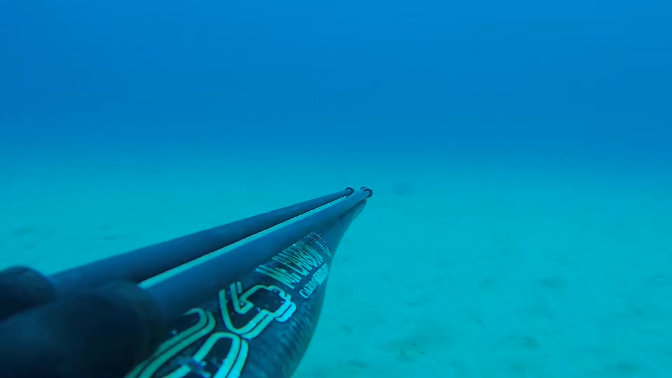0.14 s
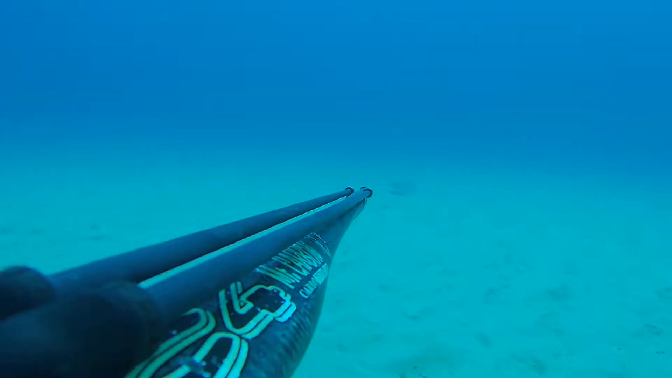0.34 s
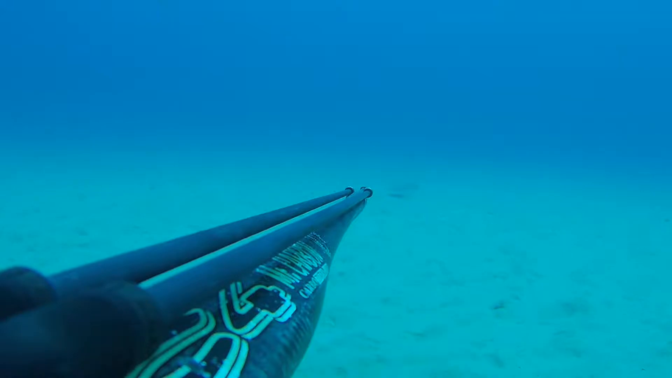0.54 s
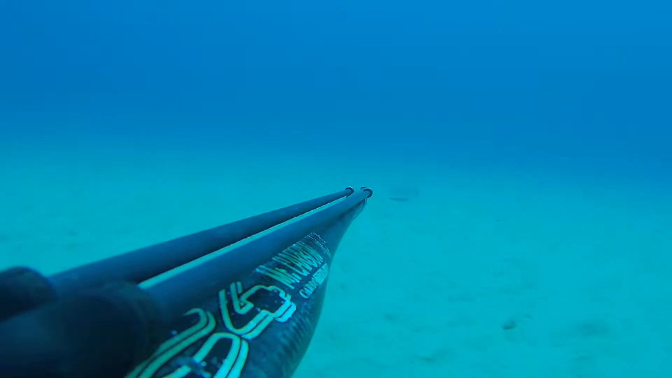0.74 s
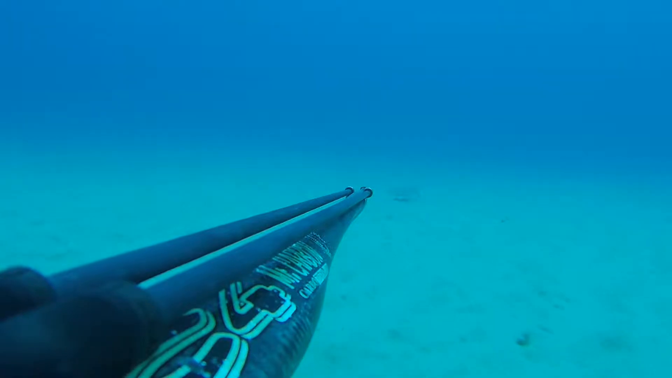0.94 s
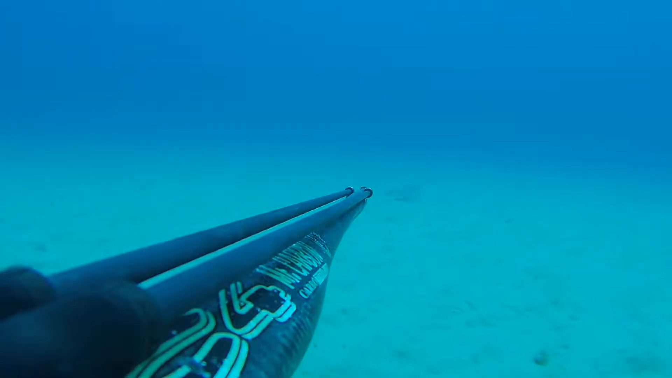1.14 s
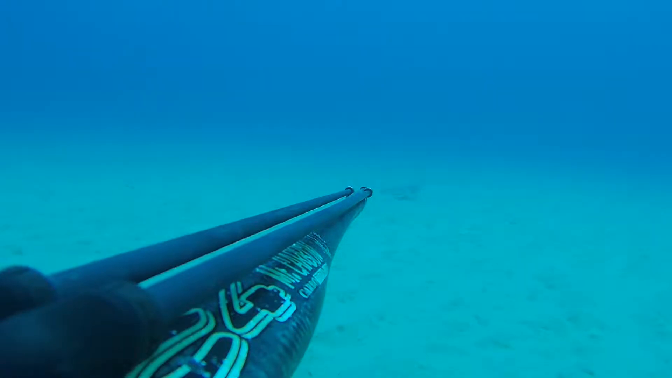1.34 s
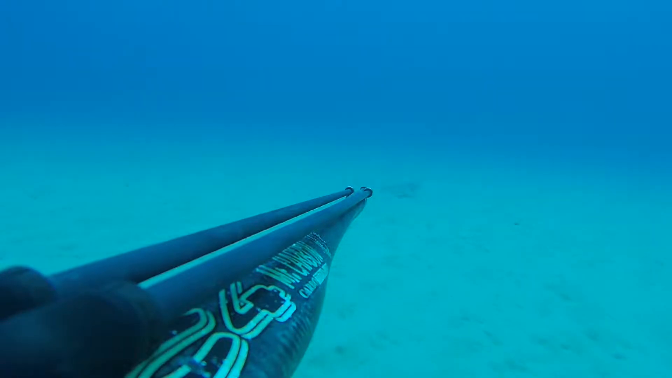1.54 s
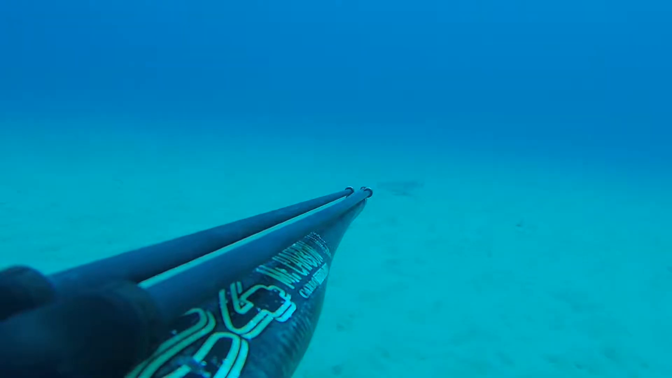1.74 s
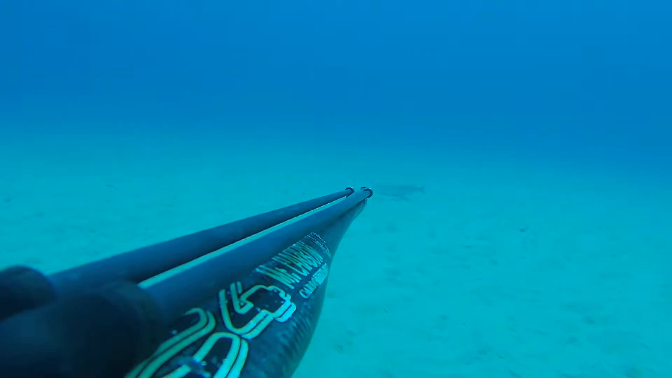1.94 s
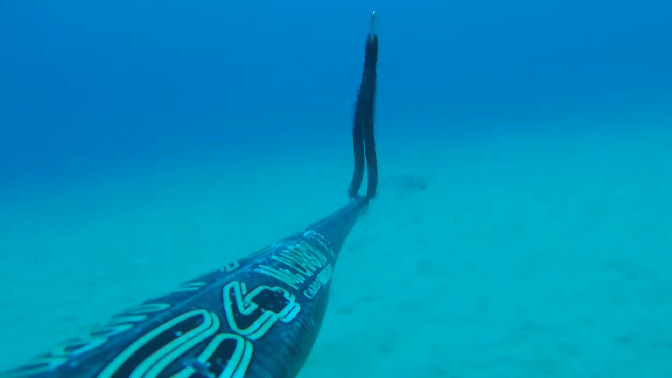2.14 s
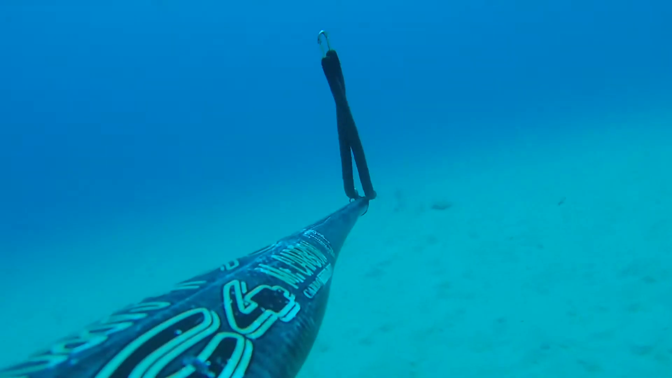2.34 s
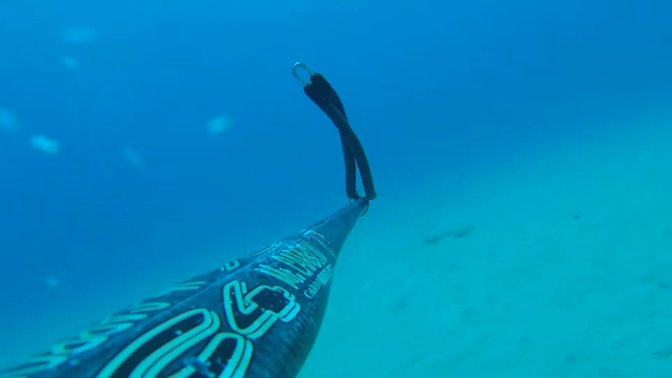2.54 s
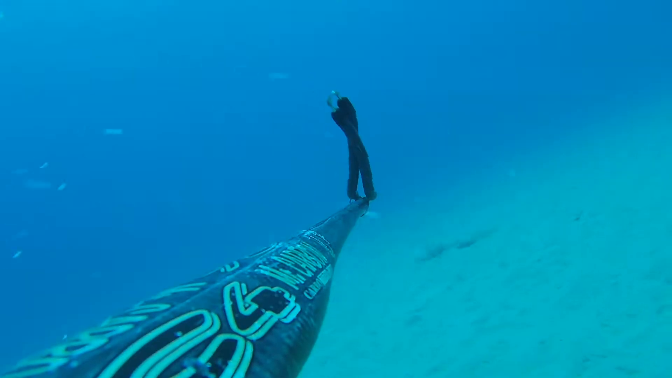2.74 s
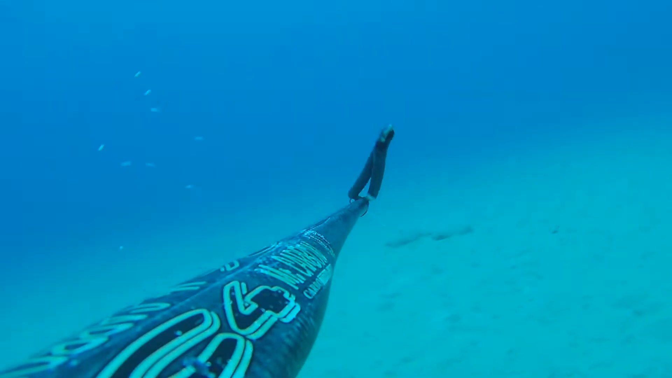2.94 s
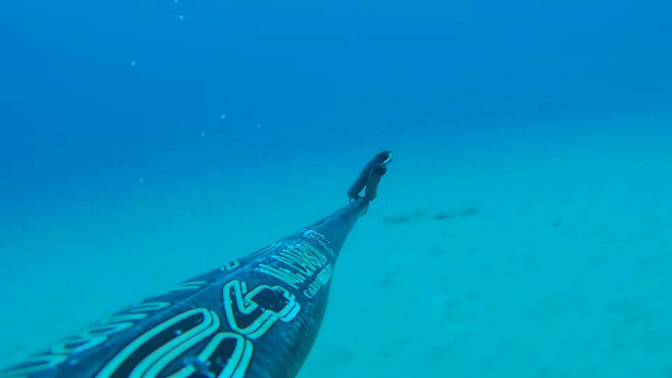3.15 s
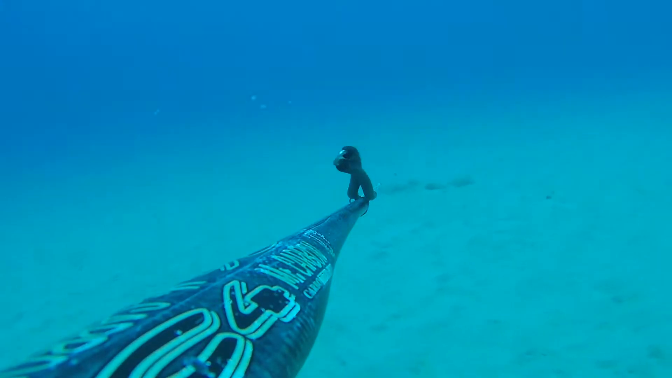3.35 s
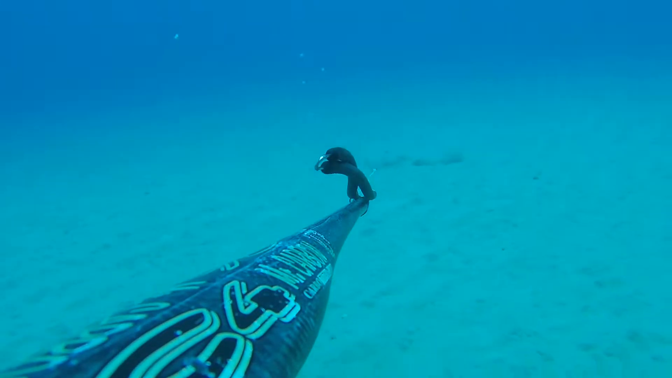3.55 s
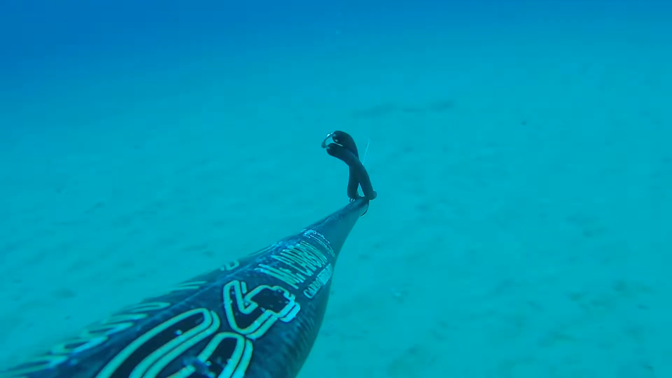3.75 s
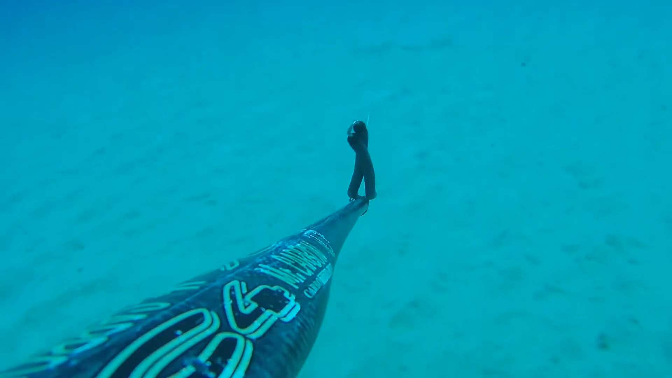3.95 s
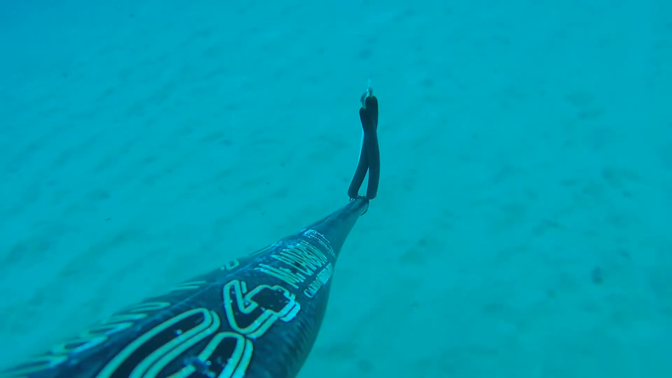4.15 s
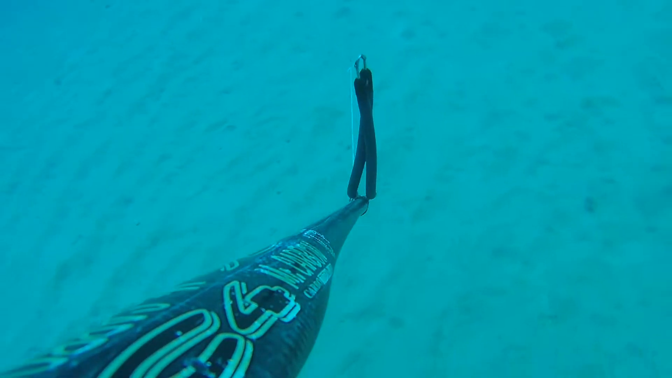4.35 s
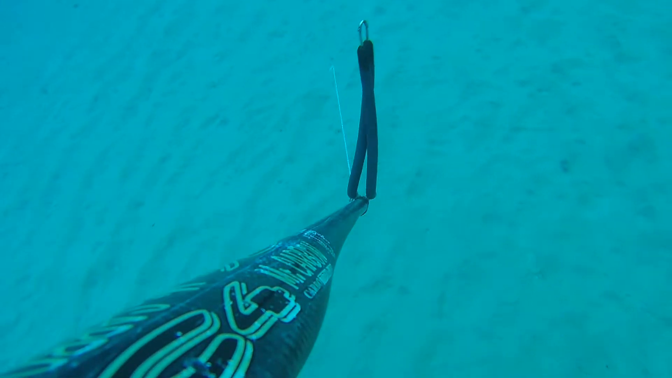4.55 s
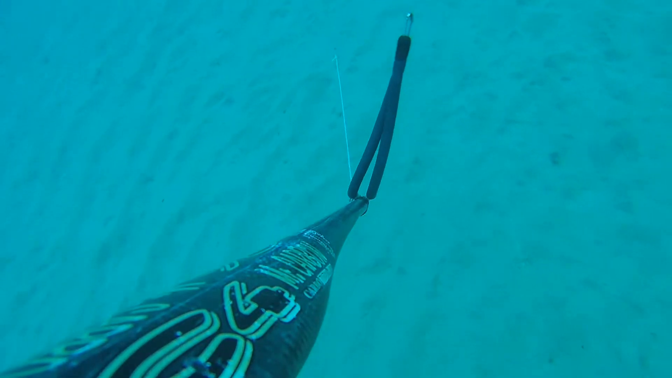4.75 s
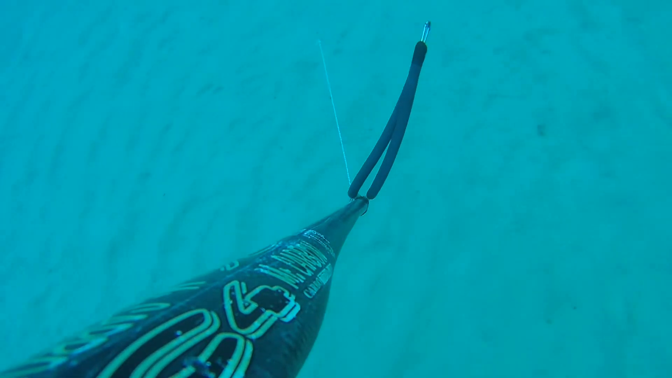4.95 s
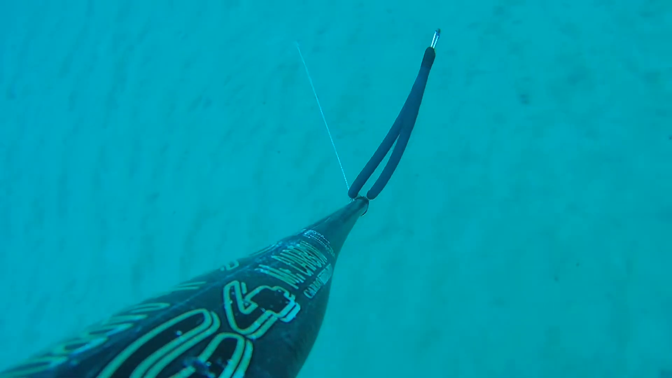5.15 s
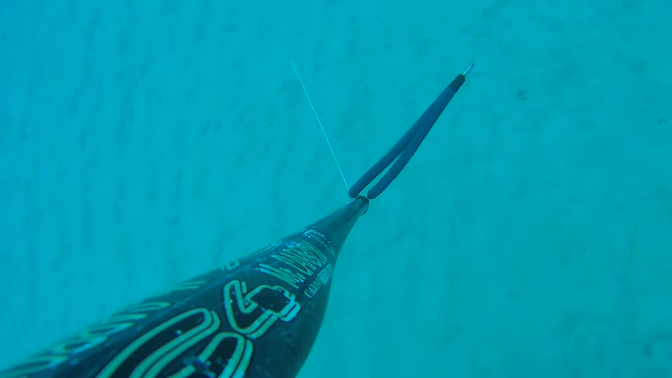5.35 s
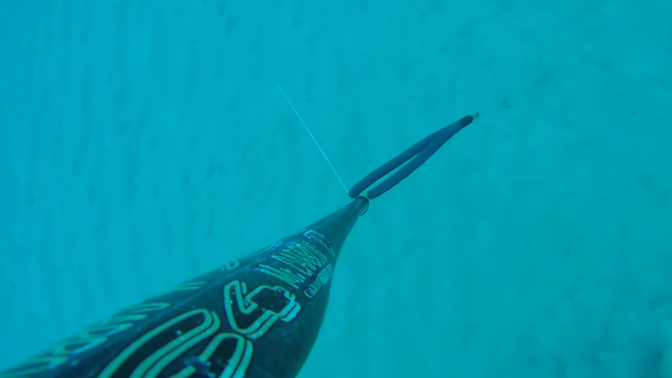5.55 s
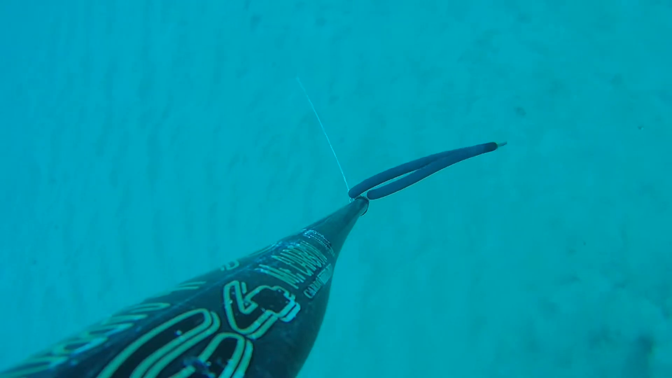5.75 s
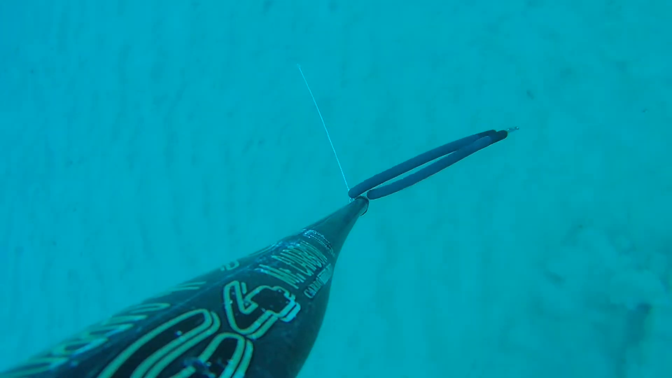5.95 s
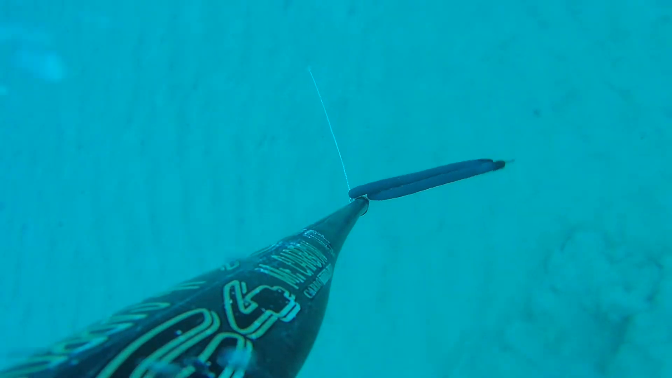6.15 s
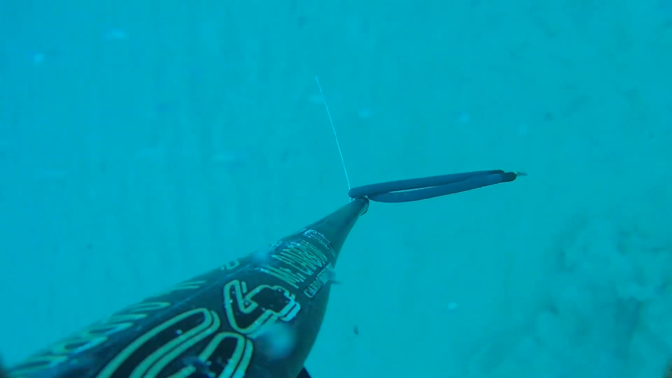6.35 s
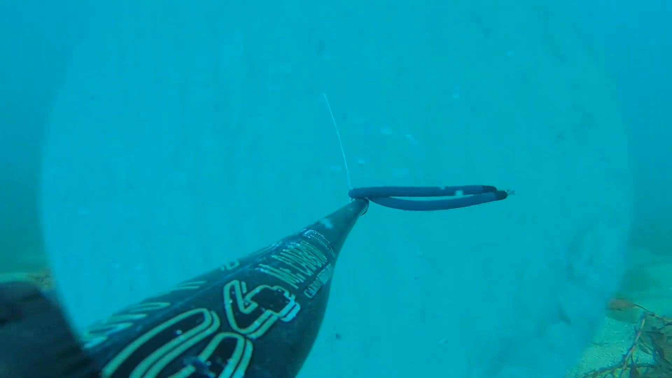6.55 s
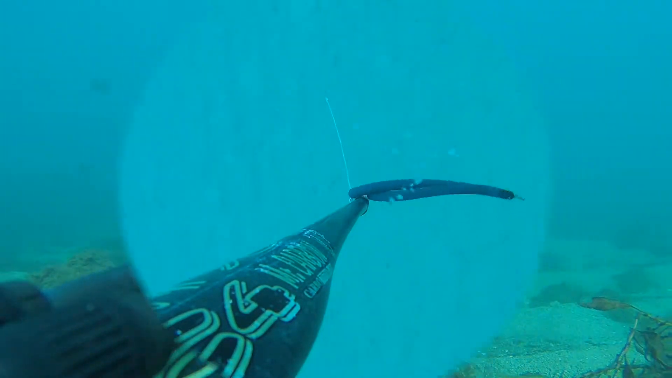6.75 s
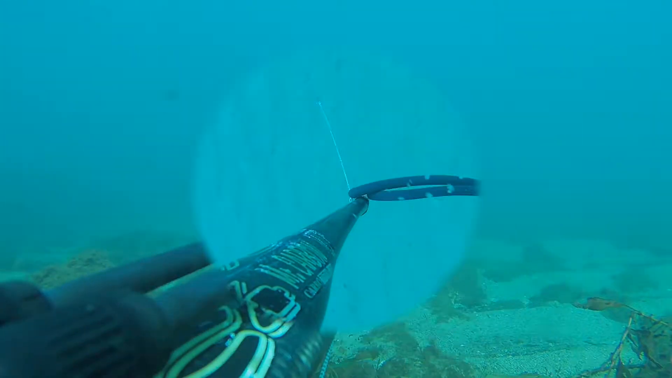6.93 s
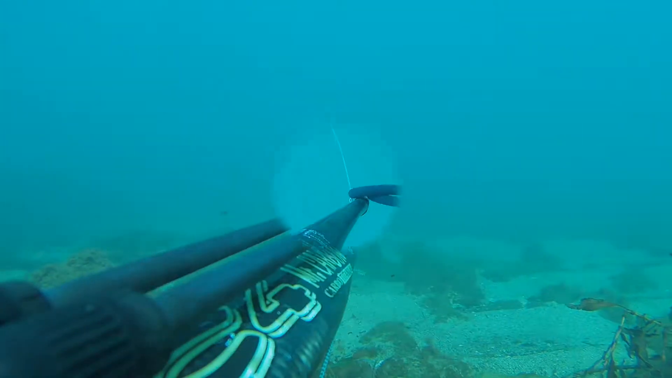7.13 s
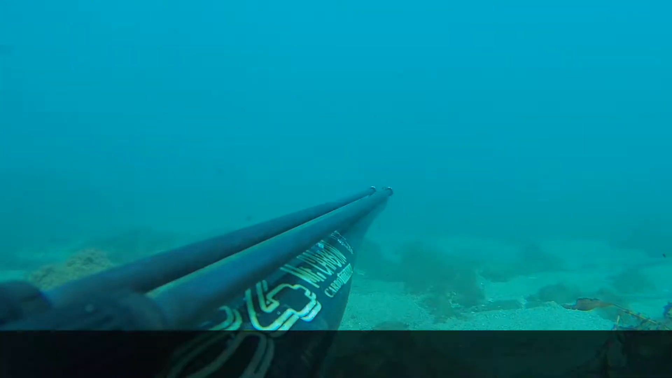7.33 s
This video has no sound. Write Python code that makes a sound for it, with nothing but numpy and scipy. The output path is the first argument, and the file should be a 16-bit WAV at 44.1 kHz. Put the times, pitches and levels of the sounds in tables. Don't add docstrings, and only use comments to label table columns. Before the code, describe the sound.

Underwater, heard from a sealed camera fixed on a speargun. Shrimp crackle steadily over soft low water surges. Near two seconds the gun fires, a brutal clipped crack and thud. The crackle drops, loose parts tick and knock, the line creaks briefly, then the crackle creeps back. From about five seconds, dull knocks, rubbing and deep wobbling rumble grow busy, then settle.

```python
import sys
import numpy as np
from scipy import signal
from scipy.fft import rfft, irfft
from scipy.io import wavfile
from scipy.ndimage import uniform_filter1d

SR = 44100
rng = np.random.default_rng(int(sys.argv[2]) if len(sys.argv) > 2 else 0)


def wrap_up_sound(samples):
    columns = np.atleast_2d(samples).T
    tamed = np.clip(columns, -1, 1)
    steps = np.round(tamed * 32767).astype(np.int16)
    wavfile.write(sys.argv[1], SR, steps)


def boost(x):
    u = np.asarray(x, float) / 20
    return 10 ** u


N = 325899


def rms_one(x):
    return x / np.sqrt(np.mean(x ** 2) + 1e-20)


def evened(x, seconds):
    return x / np.sqrt(uniform_filter1d(x ** 2, int(seconds * SR)) + 1e-20)


def in_time(rows, **ends):
    s, *columns = np.transpose(rows)
    return [np.interp(np.arange(N) / SR, s, c, **ends) for c in columns]


def band(x, low_hz, high_hz, order=2):
    return signal.sosfilt(signal.butter(order, [low_hz, high_hz], "band", fs=SR, output="sos"), x)


def resonance(x, hz, width_hz):
    r = np.exp(-np.pi * width_hz / SR)
    poles = [1, -2 * r * np.cos(2 * np.pi * hz / SR), r * r]
    return signal.lfilter([(1 - r * r) / 2, 0, (r * r - 1) / 2], poles, x)


def coloured(x, points):
    hz, table = np.maximum(np.arange(513) * SR / 1024, 1), np.array(points)
    level_db = np.interp(np.log(hz), np.log(table[:, 0]), table[:, 1])
    cepstrum = irfft(np.log(boost(level_db)))
    cepstrum[1:512] *= 2
    cepstrum[513:] = 0
    impulse = irfft(np.exp(rfft(cepstrum)))
    return signal.oaconvolve(x, impulse)[:len(x)]


def drift(rate_hz):
    steps = rng.standard_normal(400)
    return np.interp(np.arange(N) / SR * rate_hz, np.arange(400), steps)


def grains(per_s, spread_db):
    sizes_db = spread_db * np.minimum(rng.exponential(1, N), 3.6)
    sizes = boost(sizes_db) * rng.choice([-1, 1], N)
    return sizes * (rng.random(N) < per_s / SR) + 1e-18


def strokes(s, hold_s, level_db, rise_db_per_s, fall_db_per_s):
    t = np.arange(0, N + 32, 32)[:, None] / SR
    rise_db = rise_db_per_s * np.maximum(s - t, 0)
    fall_db = fall_db_per_s * np.maximum(t - s - hold_s, 0)
    db = level_db - rise_db - fall_db
    return np.interp(np.arange(N) / SR, t[:, 0], boost(db.max(axis=1)))


def struck(events):
    out, t = np.zeros(N + 8192), np.arange(8192) / SR
    for s, level_db, hz, t60_s in events:
        i = round(s * SR)
        settle_s = .4 / hz * (1 - np.exp(-t / .008))
        swell = 1 - np.exp(-t * hz / 0.78)
        decay = boost(level_db - 60 * t / max(t60_s, .003))
        out[i:i + 8192] += swell * decay * np.sin(2 * np.pi * hz * (t + settle_s))
    return out[:N]


# t/s, level/dB
FLOW = [(0.0, -38), (0.4, -35.5), (0.68, -31), (1.2, -35), (1.43, -30), (1.8, -35), (2.15, -27),
        (2.5, -44.5), (2.94, -34), (3.1, -39), (3.99, -36), (4.7, -40), (5.05, -37.5), (5.35, -32),
        (5.86, -28.5), (6.19, -38), (6.7, -42), (7.1, -45.5)]
# t/s, hold/s, level/dB
JOLTS = [(0.2, 0.16, -51.5), (0.48, 0.033, -42.5), (.72, 0.2, -52), (1.023, 0.37, -49), (1.55, 0.23, -50),
         (2.023, 0.047, -25.5), (2.222, 0.16, -35), (2.406, 0.14, -45), (2.626, 0.1, -34.5),
         (2.782, 0.15, -41), (3.014, 0.15, -50), (3.283, 0.27, -44.5), (3.702, 0.03, -63),
         (3.843, 0.19, -43), (4.025, 0.067, -36), (4.156, 0.052, -37.5), (4.318, 0.078, -34.5),
         (4.47, 0.12, -40.5), (4.709, 0.037, -33.5), (4.83, 0.93, -39), (5.392, 0.074, -24.5),
         (5.478, 0.12, -22), (5.63, 0.15, -30), (5.77, 0.036, -26), (5.872, .012, -23),
         (5.955, 0.026, -24.5), (5.999, 0.064, -25.5), (6.09, .01, -37), (6.132, 0.0087, -19.5),
         (6.174, 0.031, -17.5), (6.237, 0.01, -20), (6.308, .02, -25.5), (6.34, 0.016, -21),
         (6.375, 0.063, -24), (6.511, 0.026, -19), (6.637, 0.049, -28.5), (6.787, 0.078, -32.5),
         (6.975, 0.16, -43)]


def water():
    surge_db = in_time(FLOW)[0] + 2.5 * drift(5.1)
    surge = band(rng.standard_normal(N + SR), 7.4, 33.4, order=4)[SR:]
    jolted = boost(-58) + strokes(*np.transpose(JOLTS), rise_db_per_s=401, fall_db_per_s=409)
    wander = rms_one(resonance(rng.standard_normal(N + SR), 1.9, 16.8)[SR:])
    wobble_hz = 55.4 + 6.1 * wander
    phase = 2 * np.pi * np.cumsum(wobble_hz) / SR
    wobble = np.sin(phase) + boost(-23.5) * np.sin(2 * phase)
    calm_start = np.minimum(np.arange(N) / SR / .04, 1)
    return calm_start * (boost(surge_db) * evened(surge, 0.13) + jolted * evened(wobble, 0.062))


# t/s, level/dB
CRACKLE = [(0.0, -56), (0.7, -53), (1.15, -55.5), (1.92, -54.5), (2.23, -69.5), (2.39, -69), (2.76, -57.5),
           (3.27, -51.5), (3.6, -55), (4.3, -53.5), (4.45, -50), (5.06, -54), (5.95, -52), (6.52, -53),
           (7.02, -58), (7.39, -60)]
# t/s, peak level/dB, upper ring re peak/dB
SNAPS = [(0.093, -24, -17), (0.207, -26.5, -13), (0.311, -29, -8.5), (0.3915, -26.5, -27),
         (0.492, -31.5, -35), (0.7744, -32.5, -4), (0.9068, -27.5, -15), (0.6275, -33, -15),
         (1.056, -28.5, -32), (1.2241, -24.5, -33), (1.429, -25, -12), (1.609, -27, -11), (1.778, -27, -14),
         (1.933, -10.5, -7.5), (3.079, -31, -7), (3.1092, -28, -7), (3.3518, -33, -7), (3.417, -23.5, -32),
         (3.7378, -29, -35), (4.018, -25, -37), (4.3045, -31, -4), (4.5505, -26.5, -10),
         (5.198, -31.5, -2.5), (5.3032, -26.5, -36), (5.428, -36.5, -1), (5.983, -30, -30),
         (6.0643, -39, -20), (6.24, -34, -2), (6.278, -24.5, -41), (6.4506, -25.5, -41), (7.111, -33, -15)]
# t/s, peak level/dB
MORE_SNAPS = [(0.5338, -33.5), (0.988, -31.5), (1.072, -28.5), (1.297, -30.5), (1.507, -41),
              (1.658, -29.5), (1.7183, -32), (2.8383, -36), (2.892, -30.5), (3.0293, -30), (3.221, -32),
              (3.4712, -40), (3.5243, -29), (3.577, -30), (3.8193, -38), (4.1288, -31.5), (4.453, -32),
              (4.742, -31), (4.853, -31.5), (5.2648, -33), (5.384, -31.5), (5.4641, -36), (6.388, -28.5),
              (6.559, -34), (7.3088, -32.5), (0.191, -39), (0.4623, -35), (0.526, -38), (0.5871, -35),
              (0.7343, -39), (0.9303, -41), (1.039, -30), (1.1228, -33), (1.3428, -37), (1.574, -34),
              (1.8163, -36), (1.921, -27), (2.5218, -42), (2.7738, -42), (2.94, -35), (3.1972, -40),
              (3.2596, -40), (3.4386, -28), (3.6218, -43), (3.9166, -37), (3.9391, -30.5), (4.214, -42),
              (4.4918, -43), (4.5712, -38), (4.653, -43), (5.1404, -30), (5.5145, -38), (5.756, -32),
              (6.303, -33), (6.423, -32), (6.638, -31.5), (6.7328, -34), (6.795, -31.5), (6.9493, -48),
              (7.0363, -39)]
# f/Hz, density/dB per Hz
HOUSING = [(1760, -48.5), (3000, -15.5), (4280, -19.5), (5050, -2.5), (5390, 0), (5840, -1), (6840, -5.5),
           (8060, -1.5), (8610, -2), (10700, -25), (11600, -22), (13400, -15.5), (14000, -21), (14500, -32)]


def shrimp():
    gain = boost(in_time(CRACKLE)[0])
    t = np.arange(600) / SR
    echo_decay = boost(-60 * t / 0.019)
    far = 0.086 * rng.standard_normal(N) * boost(3.1 * drift(27.0))
    # low/Hz, high/Hz, level/dB
    for low_hz, high_hz, db in ((1500, 22000, -3), (7200, 11500, 0), (10700, 21000, -7), (5000, 6100, 3.5)):
        echoes = band(rng.standard_normal(600) * echo_decay, low_hz, high_hz, order=1)
        snaps = grains(200.0 * boost(5.5 * drift(10.0)), spread_db=7.5)
        far += signal.oaconvolve(snaps, 0.033 * boost(db) * echoes)[:N]

    common_upper_db = -19
    s, peak_db, upper_db = np.transpose(SNAPS + [(s, db, common_upper_db) for s, db in MORE_SNAPS])
    near = np.zeros((2, N + 600))
    near_decay = boost(-60 * t / 0.0067) + boost(-14 - 60 * t / 0.094)
    puffs = rng.standard_normal((len(s), 600))
    for i, low_db, high_db, puff in zip((s * SR).astype(int), peak_db, peak_db + upper_db, puffs):
        near[:, i:i + 600] += boost([[low_db + 7], [high_db + 12]]) * puff / puff[:60].std() * near_decay
    near = band(near[0], 1500, 5100, order=1) + band(near[1], 6930, 14000)
    through_wall = boost(-20.5) * band(near[:N], 1300, 4200)
    return gain * rms_one(coloured(far, HOUSING)) + coloured(near[:N], HOUSING) + through_wall


TRIGGER_S = 1.927


def recovery():
    since_s = np.arange(N) / SR - TRIGGER_S
    ducked = np.clip(1 - 1.09 * np.exp(-(since_s / 0.78) ** 2), .05, 1)
    return np.where(since_s > 0, ducked, 1)


# f/Hz, density/dB per Hz
SELF_NOISE = [(60, -25.5), (90, 1), (134, -1), (228, -4), (500, -12), (1050, -17.5), (2230, -19),
              (4200, -26), (14000, -25.5)]


def preamp():
    hiss = rms_one(coloured(rng.standard_normal(N), SELF_NOISE))
    return 2 * boost(-66.5) * recovery() * hiss


# t/s, level/dB
RECOIL = [(1.927, -53), (1.932, 5), (1.95, 11.5), (1.962, 11.5), (1.98, 7), (2.0, 24), (2.02, 22.5),
          (2.05, 7), (2.066, 7), (2.073, -1), (2.079, -11), (2.083, -16.5), (2.088, -15), (2.092, -16),
          (2.097, -16), (2.102, -32), (2.112, -40)]
# t/s, level/dB
SHUDDER = [(1.926, -54.5), (1.932, -9), (1.951, -6.5), (1.962, -1.5), (1.979, -5.5), (1.992, -12),
           (2.062, -28), (2.079, -21.5), (2.112, -46)]
# t/s, length/s
JERKS = [(1.929, .0043), (1.9355, .0033), (1.9405, .006), (1.9498, .001), (1.9522, .0013), (1.9562, .0109),
         (1.972, .0039), (1.9777, .0055), (1.9854, .0015), (1.9882, .0008), (1.9995, .0037),
         (2.0039, .0089), (2.0202, .0005), (2.034, .009), (2.0657, .0089), (2.0766, .0028), (2.0824, .0009),
         (2.0872, .0013), (2.0905, .002), (2.102, .01)]
# t/s, hold/s, level/dB
CHATTER = [(1.9325, 0.054, -14), (1.933, .0008, -1.5), (1.9397, 0.0016, 5), (1.9435, 0.0017, 3),
           (1.95, 0.0011, -2), (1.967, .0006, -9.5), (1.9725, .0006, -5), (1.9794, 0.0028, 4.5),
           (1.976, 0.00068, -4), (1.9871, .0006, -12.5), (2.0203, 0.00025, 1.5), (2.084, .001, -41)]


def shot():
    recoil_db, shudder_db = (in_time(c, left=-150, right=-150)[0] for c in (RECOIL, SHUDDER))
    reversals_s = [edge for s, length in JERKS for edge in (s, s + length)]
    half_turns = np.interp(np.arange(N) / SR, reversals_s, np.arange(len(reversals_s)))
    recoil = -boost(recoil_db) * np.sin(np.pi * half_turns)
    shudder = rms_one(band(resonance(rng.standard_normal(N), hz=156, width_hz=89), 36.4, 510))
    white = rng.standard_normal(N)
    chatter = rms_one(coloured(white, HOUSING) + 1.07 * resonance(white, 1200, 900))
    bursts = strokes(*np.transpose(CHATTER), rise_db_per_s=14997, fall_db_per_s=8998)
    return boost(shudder_db) * shudder + bursts * chatter + recoil


# t/s, peak level/dB, centre f/Hz
RATTLE = [(2.0789, -15.5, 7700), (2.087, -33, 1100), (2.098, -43, 1200), (2.115, -37, 1200),
          (2.127, -40, 1000), (2.141, -20, 6200), (2.141, -40, 1970), (2.165, -33.5, 890),
          (2.181, -41, 1080), (2, -37, 1080), (2.204, -44, 1075), (2.213, -41, 1000), (2.278, -42, 740),
          (2.278, -57, 1700), (2.292, -48, 630), (2.674, -55, 656), (5.195, -39.5, 1800), (5.402, -43, 410),
          (6.066, -26, 4740), (6.067, -47, 1400), (6.518, -43, 3100), (6.531, -47.5, 2000),
          (6.701, -44.5, 2600), (6.12, -48, 1700), (5.0, -44, 630), (7.311, -45, 2210), (2.079, -28, 2800),
          (2.141, -24.5, 8550), (2.103, -43, 7000), (2.11, -40, 7200), (2.114, -45, 5500),
          (2.165, -48, 5340), (2.19, -48, 5000), (2.205, -53, 5500), (2.214, -54, 5500), (2.291, -53, 5600),
          (2.109, -50, 1800), (2.158, -53, 2100), (6.132, -52, 2200), (6.199, -55, 2400), (6.59, -50, 2000),
          (6.701, -46, 4280), (5.466, -47, 2500), (5.511, -53, 1200), (5.548, -54, 1500), (5.97, -53, 1200),
          (6.032, -48, 2200), (2.166, -48, 2000), (2.19, -47, 1900), (2.206, -50, 2000), (2.215, -54, 1900),
          (2.116, -48, 1900), (2.086, -42, 6000), (3.3, -52, 1900), (3.046, -49, 1400), (3.7, -51, 3000),
          (2.896, -58, 2000), (2.728, -58, 1900)]


def rattle():
    out, t = np.zeros(N), np.arange(1500) / SR
    for (s, peak_db, hz), puff in zip(RATTLE, rng.standard_normal((len(RATTLE), 1500))):
        span = 1.6 ** min(2200 / hz, 1) ** 0.74
        decay = boost(-60 * t * hz / 15.0 / (1 + hz / 4000))
        tick = band(puff * decay, hz / span, hz * span, order=3)
        i = round(s * SR)
        out[i:i + 1500] += boost(peak_db) * tick / np.abs(tick).max()
    return out


def rocking():
    since_s = np.arange(N) / SR - 2.0866
    hold_s, fall_db_per_s = 0.1, 250.5
    level_db = -19 - fall_db_per_s * np.maximum(since_s - hold_s, 0)
    return (since_s > 0) * boost(level_db) * np.sin(2 * np.pi * 42 * since_s)


# t/s, hold/s, barrel level/dB, stock level/dB, fitting level/dB
RUB = [(2.09, 0.11, -30, -42.5, -63), (2.278, 0.012, -31, -50.5, -73), (2.784, 0.092, -56, -66, -73),
       (2.9, 0.31, -60.5, -64, -65), (3.355, 0.13, -53, -62.5, -72), (3.809, 0.038, -43.5, -48.5, -66),
       (3.93, 0.15, -51.5, -65, -80), (4.062, 0.3, -43.5, -54, -60.5), (4.277, 0.2, -41, -52, -63),
       (4.468, 0.17, -47, -60.5, -66), (4.668, 0.18, -51.5, -66, -57.5), (4.901, 0.24, -50.5, -59, -58),
       (5.202, 0.12, -50.5, -50.5, -51.5), (5.393, 0.012, -31, -59, -76), (5.43, 0.36, -43.5, -63, -71),
       (5.759, 0.035, -42, -49.5, -53.5), (5.812, 0.077, -36.5, -51, -57), (5.94, 0.057, -34.5, -55, -69),
       (6.108, 0.18, -37, -50, -62.5), (6.28, 0.18, -46, -60.5, -64), (6.482, 0.048, -38, -51.5, -63),
       (6.646, 0.065, -47.5, -61, -71), (6.775, 0.051, -49, -68, -66), (6.894, 0.22, -56, -94, -99)]
# f/Hz, width/Hz, level/dB
STOCK = [(160.3, 58.4, 2), (226.3, 32.3, 1), (576, 180, -4), (1167, 220, -8.5), (1239, 42.2, -11.5),
         (88.6, 31, -0.5), (335, 56, -20.5)]


def rubbing():
    s, hold_s, barrel_db, stock_db, fitting_db = np.transpose(RUB)
    efforts_db = [barrel_db - 6.5, barrel_db - 7.0, stock_db, fitting_db, fitting_db,
                  barrel_db - 4.0, barrel_db]
    slips = grains(1700.0 * boost(3.3 * drift(25.0)), spread_db=4.5)
    out = np.zeros(N)
    for (hz, width_hz, level_db), effort_db in zip(STOCK, efforts_db):
        ringing = resonance(slips, hz, width_hz)
        ringing = band(ringing, hz - 1.2 * width_hz, hz + 1.2 * width_hz, order=3)
        gain = strokes(s, hold_s, effort_db + level_db, rise_db_per_s=796, fall_db_per_s=400)
        out += gain * evened(ringing, 0.041)
    return out


# t/s, peak level/dB, f/Hz, t60/s
KNOCKS = [(2.115, -32, 190, 0.032), (2.163, -14, 198, 0.046), (2.187, -14.5, 192, 0.067),
          (2.208, -26, 193, 0.035), (2.277, -20, 187, 0.07), (3.798, -38.5, 249, 0.13),
          (5.39, -19, 182, 0.059), (5.398, -19, 340, 0.019), (5.811, -26.5, 262, 0.032),
          (5.968, -26, 150, 0.054), (6.012, -30, 228, .04), (5.754, -21.5, 180, 0.055),
          (5.826, -17.5, 165.5, 0.093), (5.935, -14.5, 186, 0.024), (6.117, -20.5, 190, 0.12),
          (6.167, -20, 183, 0.13), (6.48, -35, 124, 0.049), (6.508, -19, 128, 0.117),
          (6.53, -20, 183, 0.079), (6.635, -33, 188, 0.11), (3.398, -29, 102, 0.046), (5.77, -27, 95, .1),
          (5.94, -22, 90, .1), (6.245, -17, 150, 0.046), (2.1635, -27, 483, .02), (2.1885, -29, 500, .02),
          (2.114, -31, 480, .02), (2.21, -31, 450, .02), (6.99, -42, 104, 0.13)]
# t/s, peak level/dB, f/Hz, t60/s
BLIPS = [(2.56, -59, 1470, 0.071), (2.97, -55.5, 1450, 0.15), (3.1, -54, 1380, 0.12),
         (4.135, -54, 1500, 0.12), (4.655, -41, 1120, 0.029), (5.61, -51, 1095, 0.088),
         (5.81, -48, 1194, 0.13), (6.068, -32, 530, 0.033), (6.065, -37, 2160, .015),
         (6.169, -48, 2020, 0.073), (6.235, -47, 1330, 0.075), (6.3, -51, 1450, 0.095),
         (6.455, -36, 1190, 0.0094), (6.828, -40, 930, 0.024), (6.837, -55, 960, 0.03)]


def knocks():
    return band(struck(KNOCKS), 38, 890) + band(struck(BLIPS), 240, 4000)


# t/s, hold/s, lower ring level/dB, lower f/Hz, upper f/Hz
CREAKS = [
    (2.403, 0.042, -47.5, 364.6, 720),
    (2.447, .008, -51, 342, 669),
    (2.459, 0.019, -53.5, 331.5, 623),
    (2.5, 0.0089, -52.5, 282, 601),
    (2.524, 0.023, -56, 280, 667),
    (2.571, 0.012, -45, 252, 705),
    (2.598, 0.0073, -35.5, 254, 644),
    (2.61, 0.023, -38, 275, 610),
    (2.673, 0.007, -42.5, 236, 622),
    (2.708, 0.033, -35, 274.8, 666),
]


def creak():
    s, hold_s, level_db, low_hz, high_hz = np.transpose(CREAKS)
    gain = strokes(s, hold_s, level_db, rise_db_per_s=1999.5, fall_db_per_s=1104)
    sag = 1 - 1.98 * hold_s
    edges_s = np.ravel([s, s + hold_s], "F")
    out = np.zeros(N)
    for start_hz, rough, ring_db in ((low_hz, .5, 2.0), (high_hz, .75, 1)):
        hz = np.interp(np.arange(N) / SR, edges_s, np.ravel([start_hz, start_hz * sag], "F"))
        grip = 1 + rough * rms_one(band(rng.standard_normal(N), 14.2, 76.6))
        out += boost(ring_db) * gain * grip * np.sin(2 * np.pi * np.cumsum(hz) / SR)
    rasp = rms_one(band(rng.standard_normal(N), 760, 1206, order=3))
    return out + boost(-18.5) * gain * rasp


# t/s, level/dB
SWISH = [(2.85, -79), (2.95, -70), (3.01, -69), (3.045, -59), (3.09, -63.5), (3.15, -68), (4.2, -80),
         (4.35, -63), (4.5, -70), (6.08, -70), (6.18, -59.5), (6.35, -79)]


def swish():
    births, dealt = grains(350.0, spread_db=1.0), rng.integers(0, 8, N)
    rings = np.zeros(N)
    for k, hz in enumerate(np.geomspace(800, 3200, 8)):
        rings += resonance(births * (dealt == k) + 1e-18, hz, hz / 11.5)
    level_db = in_time(SWISH, left=-120, right=-120)[0]
    return boost(level_db) * rms_one(band(rings, 700, 2500))


# multiple of f, level/dB
PLOP_OVERTONES = [(2.5, -21), (3.1, -26)]


def plop():
    from_hz, to_hz, glide_s, rise_s = 1300, 858, 0.004, 0.0083
    t = np.maximum(np.arange(N) / SR - 6.812, 0)
    turns = to_hz * t + (from_hz - to_hz) * glide_s * (1 - np.exp(-t / glide_s))
    tone = np.sin(2 * np.pi * turns)
    for multiple, db in PLOP_OVERTONES:
        tone = tone + boost(db) * np.sin(2 * np.pi * multiple * turns)
    swell = (t / rise_s * np.exp(1 - t / rise_s)) ** 3.7
    return boost(-38.5) * tone * swell


def scene():
    gun = shot() + rattle() + rocking() + rubbing() + knocks() + creak() + plop()
    return (water() + shrimp() + preamp() + gun + swish())[None]


def low_pass(x):
    return signal.sosfilt(signal.butter(12, 15400, fs=SR, output="sos"), x)


def record(dry):
    rail, ceiling = .263, .37
    railed = np.clip(dry - 0.02 * recovery(), -rail, rail)
    excess = dry - np.clip(dry, -rail, rail)
    railed = railed + boost(-27.5) * np.tanh(band(excess, 1700, 16000))
    top_cut = signal.cheby2(9, 30, 14450, fs=SR, output="sos")
    mix = signal.sosfilt(top_cut, railed).clip(-ceiling, ceiling)
    return low_pass(mix)


dry = scene()
out = record(dry)
wrap_up_sound(out)
```